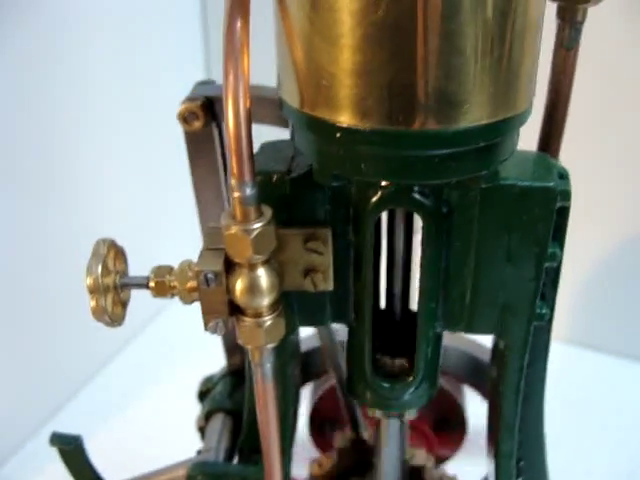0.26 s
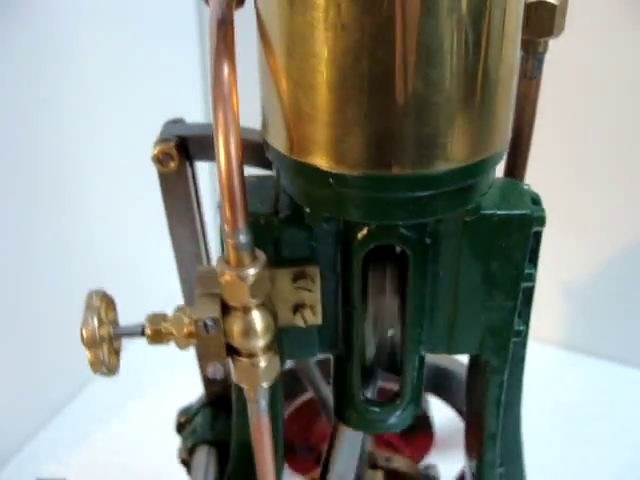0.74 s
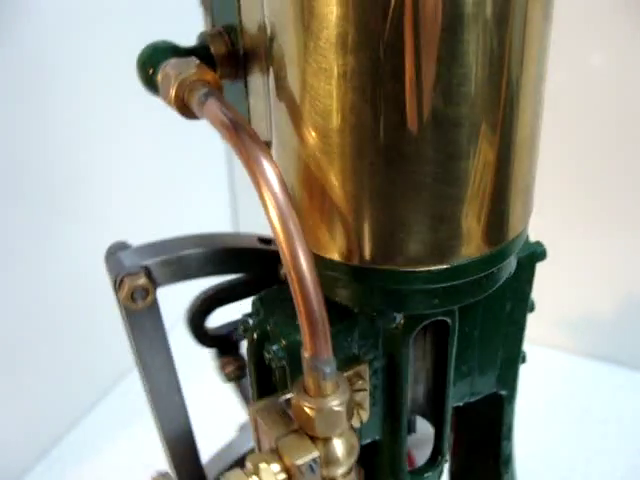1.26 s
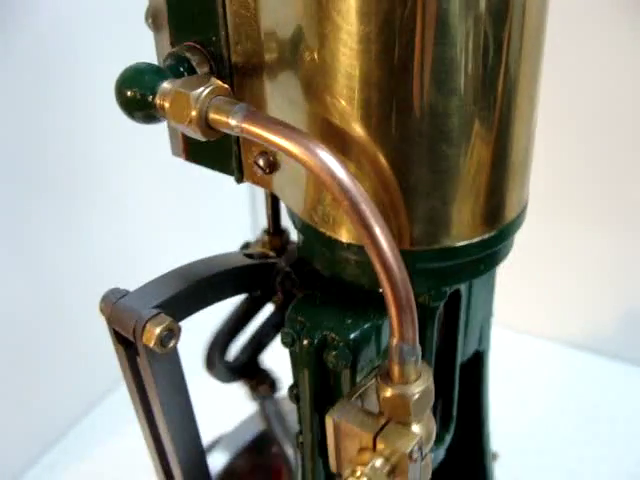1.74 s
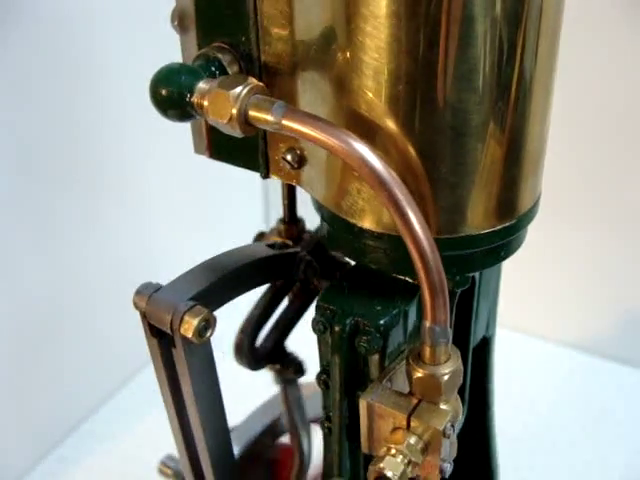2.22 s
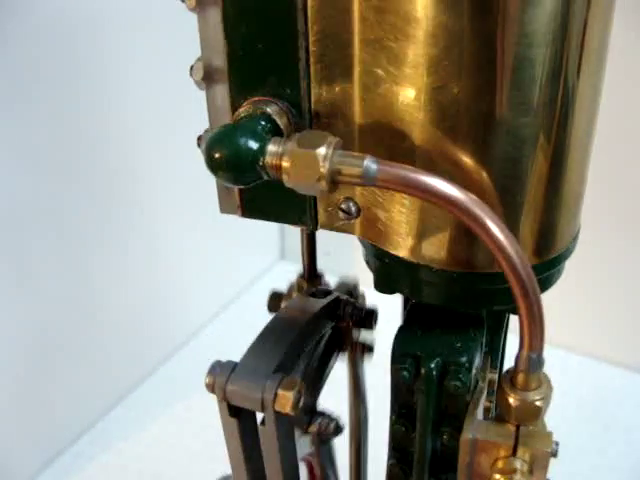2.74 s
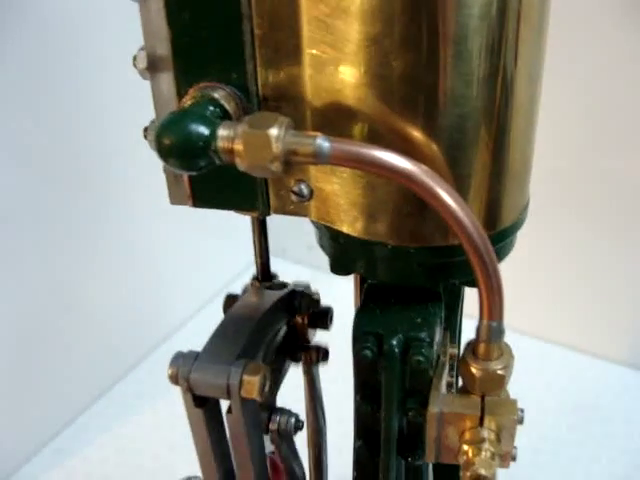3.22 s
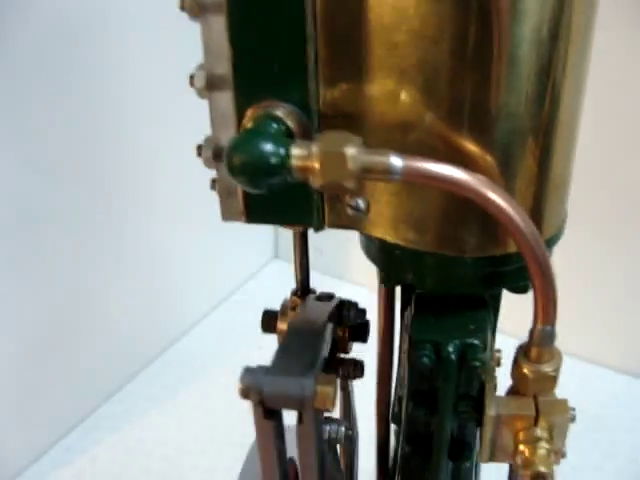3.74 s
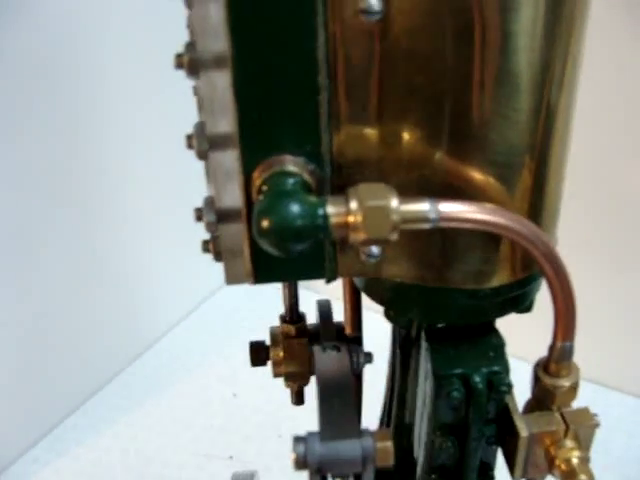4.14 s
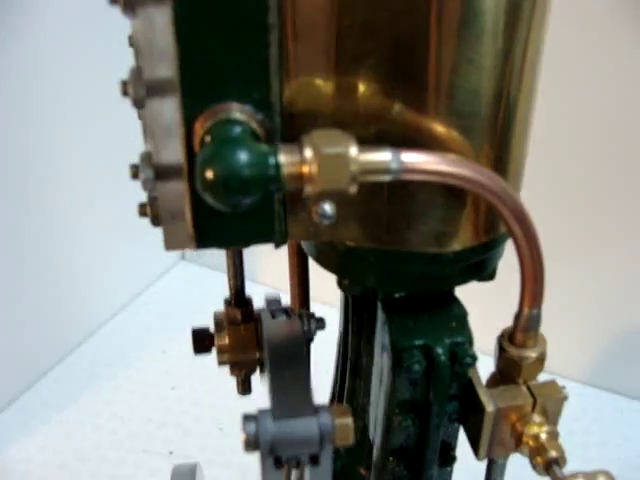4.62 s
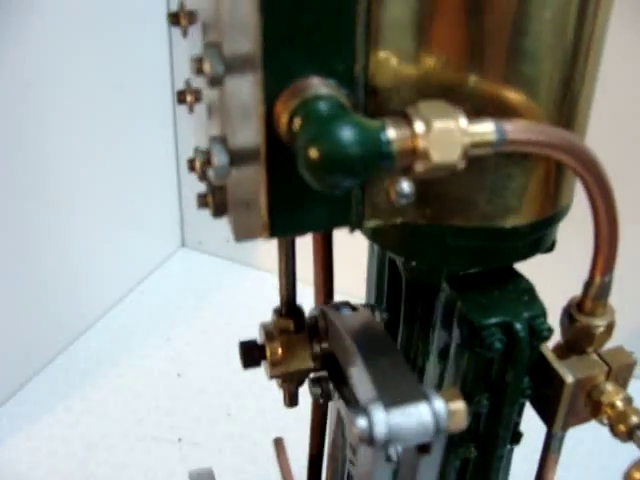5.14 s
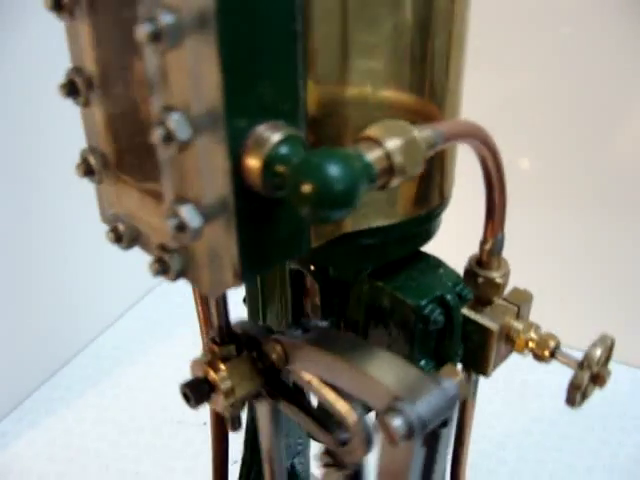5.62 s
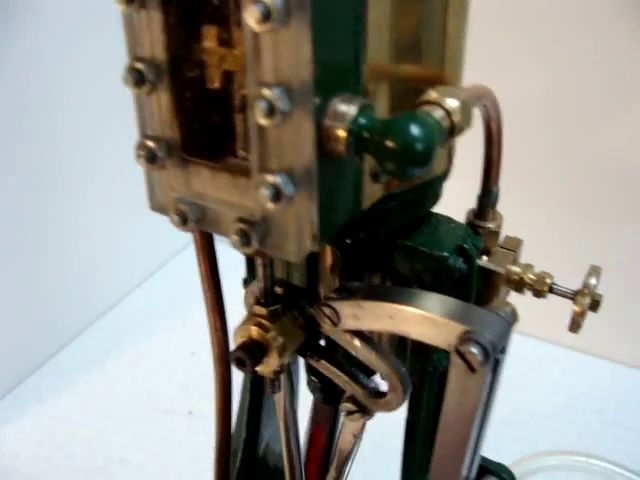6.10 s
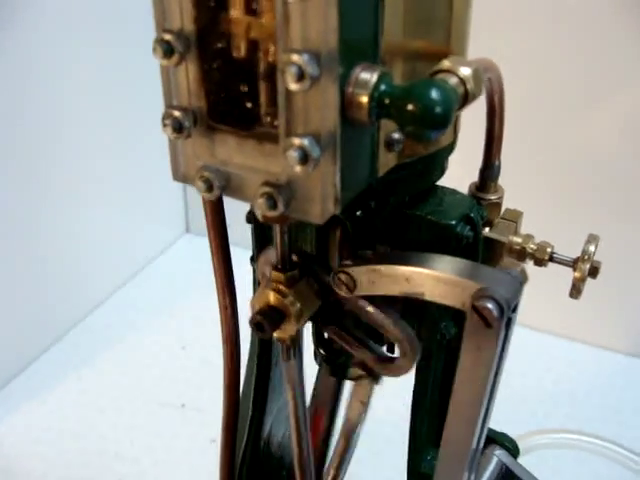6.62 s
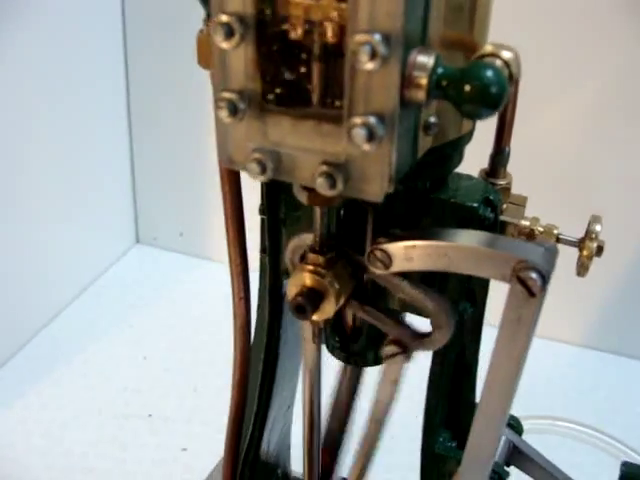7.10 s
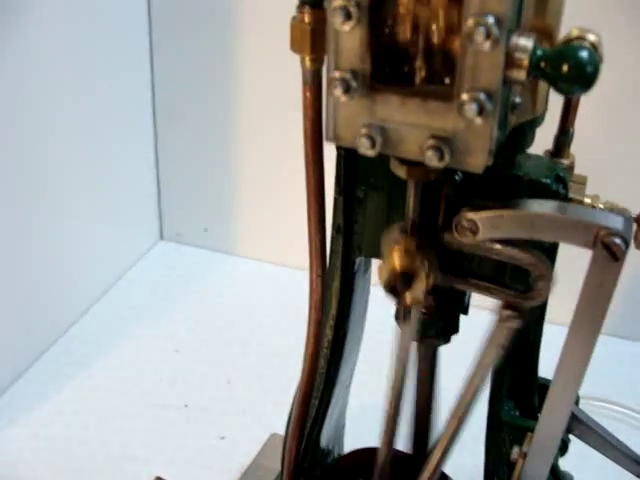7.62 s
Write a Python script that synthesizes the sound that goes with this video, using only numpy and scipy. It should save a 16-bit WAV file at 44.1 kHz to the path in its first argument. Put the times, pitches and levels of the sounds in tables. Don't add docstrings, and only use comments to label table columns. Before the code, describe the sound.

A small model engine running on compressed air on a table in a small room, heard very close. Sharp bright exhaust puffs repeat nearly four times a second, each followed by a metallic tick, a soft thump and thin pipe-like whooshes. Leaking air hisses and swells now and then. A hard handling bump comes around two seconds. The hand-held camera microphone is thin, with grainy, dull-topped treble.

```python
import sys
import numpy as np
from scipy import signal
from scipy.fft import rfft, irfft, next_fast_len
from scipy.io import wavfile
from scipy.ndimage import uniform_filter1d

SR = 44100
rng = np.random.default_rng(int(sys.argv[2]) if len(sys.argv) > 2 else 0)


def volts(x):
    e = np.asarray(x, float) / 20
    return 10 ** e


def dump_mix(stems):
    frames = np.atleast_2d(stems).T
    limited = np.clip(frames, -1, 1)
    pcm = np.round(limited * 32767).astype(np.int16)
    wavfile.write(sys.argv[1], SR, pcm)


N = 346626

# top_release_s, release_db, knock_db
TURNS = [(-0.073, -30, -30), (0.199, -15.5, -17.5), (0.469, -15.5, -17.5), (0.74, -13.5, -30),
         (1.009, -15.9, -36.5), (1.282, -15.5, -17), (1.556, -15, -16), (1.826, -15, -18.5),
         (2.097, -16, -17), (2.369, -15.5, -36), (2.642, -13.5, -23), (2.913, -14.5, -22),
         (3.185, -14, -37), (3.458, -14, -22), (3.728, -14, -17.5), (4.001, -16, -28),
         (4.272, -14.5, -17.5), (4.543, -15, -16.5), (4.815, -16.5, -16), (5.087, -17.5, -17.5),
         (5.362, -17.5, -17.5), (5.632, -17.5, -16.5), (5.905, -17.5, -19), (6.177, -15.5, -18),
         (6.451, -18.5, -19.5), (6.725, -16, -21.5), (6.998, -17, -20.5), (7.276, -16, -20.5),
         (7.55, -16, -22.5), (7.823, -16.5, -30)]
# time_s, view_above_0_1, view_side_0_1, nearness_db, view_into_outlet_db
CAMERA = [(0, 0.35, 0.19, 0, 1), (.75, 0.37, 0.04, 1.1, -8.5), (1.2, 0.4, 0.5, 0.3, -9),
          (1.6, 0.67, 0.04, -0.5, 1), (2.2, .3, .05, -0.5, -2), (2.8, 0.37, .1, .5, 1.5),
          (3.9, 0.28, 0.08, 0.7, 3), (4.9, 0.32, .05, -1, 4.5), (5.4, 0.3, 0.4, -3, 4.5),
          (5.85, 0.18, 0.68, -1, 0.5), (6.5, 0.16, 0.53, -2, -1.5), (7.86, 0.07, 0.69, -1, 0.5)]

# after_top_release_ms, held_open_ms, level_db
TOP_RELEASE = (1.2, 11.5, -.5)
# after_top_release_ms, held_open_ms, level_db
BOTTOM_RELEASE = (117.5, 7.5, -22.5)
# start_ms, end_ms, peak_place_0_1, fullness_ratio, level_db
DOWN_SWEEP = (30.5, 108, .42, 1.23, -22)
# start_ms, end_ms, peak_place_0_1, fullness_ratio, level_db
UP_SWEEP = (157.5, 237.5, .48, 1.09, -22.5)
# centre_hz, width_hz, front_db, above_db, side_db
PIPE_MODES = [(590, 450, -22.5, -43, -24), (877, 510, -19.5, -19, -14.5), (1507, 380, -10, -15, -15),
              (1826, 154, -8, -13.5, -9), (2031, 226, -6.5, -3.5, -13.5), (2625, 167, -3.5, -9, -1.5),
              (3145, 315, -5, -8.5, -9.5), (3900, 220, -6.5, -12.5, -8), (4378, 240, -5.5, -9, -8),
              (4978, 440, -11, -4, -2.5), (5455, 350, -1.5, -2, -8.5), (5948, 320, -1.5, -10.5, -2),
              (6324, 410, -5.5, -3, -5), (6776, 550, -3.5, -12, -5.5), (7370, 380, -9, -6, -5.5),
              (8103, 660, -10, -10.5, -7), (8700, 440, -7.5, -14, -8.5), (9217, 530, -9.5, -13.5, -9.5),
              (10015, 254, -12, -12, -13.5)]
# frequency_hz, gain_db
RELEASE_TILT = [(300, 25.5), (1300, 1), (3000, -2), (4500, -2.5), (6200, 1.5), (10000, -1.5)]

# frequency_hz, density_db_per_hz
LEAK_SPECTRUM = [(300, -43), (600, -6.5), (1100, -6), (1700, -3), (2100, 1), (3200, -4.5), (4000, -3),
                 (4650, -7), (5300, -21), (7000, -13.5), (10000, -17)]
# centre_s, half_length_s, above_leak_db
GUSTS = [
    (1.35, 0.73, 7.3),
    (2.45, 0.16, 9.1),
    (2.9, 0.29, 5.1),
    (3.9, 0.19, 10),
    (5.35, 0.36, 10.6),
]
# frequency_hz, density_db_per_hz
RUMBLE_SPECTRUM = [(15, -49), (25, -3), (86, 8.5), (129, -5.5), (213, -4), (285, 4.5), (401, -3.5),
                   (555, 5), (882, -3), (1080, -3), (1200, -4), (1400, -8), (1500, 5.5), (1950, -44),
                   (3300, -120)]
# centre_hz, width_hz, level_db
TABLE_MODES = [(226, 25, -57), (165, 25, -59), (530, 25, -59), (700, 20, -61)]

# after_top_release_ms, pitch_hz, peak_db, t60_s
LINKAGE = [
    (-6, 231, -29.5, 0.035),
    (59, 528, -30, 0.04),
    (64, 225, -36.5, 0.11),
    (66.5, 570, -39.5, 0.036),
    (81.5, 535, -33, 0.059),
    (202, 490, -43, .05),
]
# pitch_hz, level_db, t60_s
THUMP_MODES = [(262, 0, .028), (222, -15, .07), (170, -12, .03), (550, -11, .025), (48, -10, .04)]
# pitch_hz, level_db, t60_s
POP_MODES = [(528, -1, .04), (265, -2, .03), (700, -9, .035), (530, -18, .12)]
# pitch_hz, level_db, t60_s
KNOCK_MODES = [(2770, 3.5, 0.0033), (3320, 2.5, 0.006), (4060, 4, 0.0029), (4870, -24, 0.0059),
               (1306, -10.5, 0.013)]

# centre_s, half_length_s, pitch_hz, width_hz, level_db
BRUSHES = [
    (5.36, 0.18, 4400, 2200, -32),
    (3.3, 0.066, 260, 270, -39),
    (0.3, 0.067, 180, 140, -45),
]
# start_s, pitch_hz, peak_db, t60_s
GRIP = [
    (.32, 199, -26, 0.08),
    (.68, 120, -43, 0.098),
    (2.334, 235, -28, .07),
    (2.393, 163, -5, 0.021),
    (2.311, 1650, -33, 0.25),
    (3.1, 151, -39, .06),
]
# frequency_hz, step_db
ROUNDING_STEP = [(2500, -61), (4300, -34), (5000, -20.5), (6500, -19), (8000, -25), (10000, -28.5)]

OPEN_DB_PER_MS = 7.5
SHUT_DB, SHUT_BEND = 5.5, 0.62
SEEP_DB = -38.5
STROKE_SCATTER_DB, BLOW_SCATTER_DB = 0.8, 1.3
LEAK_DB = -43
RUMBLE_DB, RUMBLE_FOLLOW = -45, 0.071
POP_DB, POP_MS = -28, 7.5
KNOCK_MS = 59.3
THUMP_DB, THUMP_MS, THUMP_FOLLOW = -36, 112.5, 0.23
ROOM_T60_S, ROOM_DB, ROOM_TOP_HZ = 0.22, -11, 3500
MIC_LOW_HZ, TOP_HZ = 120, 10080
FRAME_S, FRAME_START_S = 0.036, 0.014
STARVE_DB, STARVE_HZ, STARVE_HZ_PER_DB, AFTER_DB = 13.5, 5600, 190, 5.5

HZ = np.fft.rfftfreq(next_fast_len(N + SR), 1 / SR)
TIME_S = np.arange(N) / SR
RING_S = np.arange(SR // 6) / SR
START_S, RELEASE_DB, KNOCK_DB = np.transpose(TURNS)


def through(x, response):
    size = 2 * (len(HZ) - 1)
    return irfft(rfft(x, size) * response, size)[:N]


def unit(x):
    return x / np.sqrt(np.mean(x ** 2))


def colour(points):
    hz, db = np.transpose(points)
    return volts(np.interp(np.log(HZ + 1), np.log(hz), db))


def resonance(hz, width_hz):
    return 1j * HZ * width_hz / (hz ** 2 - HZ ** 2 + 1j * HZ * width_hz)


def noise_band(hz, width_hz):
    return unit(through(rng.standard_normal(N), resonance(hz, width_hz) ** 2))


def flicker(rate_hz):
    return unit(through(rng.standard_normal(N), 1 / (1 + (HZ / rate_hz) ** 2)))


def at_camera(column, s):
    path = np.array(CAMERA)
    return np.interp(s, path[:, 0], path[:, column])


def add(out, sound, s):
    start = int(s * SR)
    if 0 <= start < N:
        out[start:start + len(sound)] += sound


def ring(hz, t60_s, push_ms):
    push = np.hanning(int(push_ms * SR / 1000) + 3)
    grow = np.cumsum(np.pad(push, (0, len(RING_S) - len(push)))) / push.sum()
    return grow * np.sin(2 * np.pi * hz * RING_S) * volts(-60 * RING_S / t60_s)


def blows(modes, ms, turn_db, push_ms, gain_db):
    out = np.zeros(N + SR)
    chance = rng.standard_normal((len(TURNS), 2 * len(modes) + 1))
    for start_s, blow_db, c in zip(START_S, turn_db, chance):
        sound = 0
        for k, (hz, db, t60_s) in enumerate(modes):
            sound = sound + volts(db + c[2 * k]) * ring(hz * (1 + 0.03 * c[2 * k + 1]), t60_s, push_ms)
        add(out, -volts(blow_db + gain_db) * sound, start_s + (ms + 0.3 * c[-1]) / 1000)
    return out[:N]


def blow_scatter():
    return BLOW_SCATTER_DB * rng.standard_normal(len(TURNS))


def steady(points, db, patchy_db):
    return unit(through(rng.standard_normal(N), colour(points))) * volts(db + patchy_db * flicker(25))


def crank():
    starts = np.append(START_S, 2 * START_S[-1] - START_S[-2])
    return np.interp(TIME_S, starts, np.arange(len(starts)))


def crack(ms, at_ms, held_ms, db):
    opening_db = np.minimum(OPEN_DB_PER_MS * (ms - at_ms), 0)
    shutting_db = SHUT_DB * np.maximum(ms - at_ms - held_ms, 0) ** SHUT_BEND
    return db + opening_db - shutting_db


def stroke(ms, start_ms, end_ms, peak, fullness, db):
    place = np.clip((ms - start_ms) / (end_ms - start_ms), 0, 1) ** (np.log(0.5) / np.log(peak))
    return db + 20 * fullness * np.log10(np.abs(np.sin(np.pi * place)) + 1e-4)


def flow(shape, port, turn_db, lead_ms=20, turn_ms=272):
    place = crank() + lead_ms / turn_ms
    turn = np.minimum(place.astype(int), len(TURNS) - 1)
    return volts(shape((place - turn) * turn_ms - lead_ms, *port) + turn_db[turn])


def pipe_response(view):
    pipe = 0
    for k, mode in enumerate(PIPE_MODES):
        pipe = pipe + (-1) ** k * volts(mode[2 + view]) * resonance(mode[0], mode[1])
    pipe = pipe * np.abs(pipe) ** 0.5
    return pipe / np.sqrt(np.mean(np.abs(pipe) ** 2))


def exhaust():
    release_air, sweep_air = rng.standard_normal((2, N))
    near_db = at_camera(3, START_S) + STROKE_SCATTER_DB * rng.standard_normal((3, len(TURNS)))
    release = flow(crack, TOP_RELEASE, RELEASE_DB) + flow(crack, BOTTOM_RELEASE, 1.5 * near_db[0])
    release = release * volts(1.6 * flicker(300))
    sweep = flow(stroke, DOWN_SWEEP, near_db[1]) + flow(stroke, UP_SWEEP, near_db[2])
    sweep = sweep * volts(1.2 * flicker(60) + 1.1 * flicker(400))
    jet = through(release * release_air, colour(RELEASE_TILT)) + (sweep + volts(SEEP_DB)) * sweep_air
    above = np.clip(at_camera(1, TIME_S), 0, 1)
    side = np.clip(at_camera(2, TIME_S), 0, 1)
    front = np.clip(1 - above - side, 0, 1)
    heard = sum(share * through(jet, pipe_response(view)) for view, share in enumerate((front, above, side)))
    return heard * volts(0.5)


def leak():
    swell_db = sum(db * np.exp(-((TIME_S - s) / half_s) ** 4) for s, half_s, db in GUSTS)
    return steady(LEAK_SPECTRUM, LEAK_DB + swell_db, 3.3)


def rumble(rumble_db):
    return steady(RUMBLE_SPECTRUM, rumble_db, 2.5)


def table(rumble_db):
    return sum(volts(db + rumble_db + 45) * noise_band(hz, width_hz) for hz, width_hz, db in TABLE_MODES)


def linkage(pop_db):
    out = np.zeros(N + SR)
    chance = rng.standard_normal((len(TURNS), len(LINKAGE), 3))
    for start_s, blow_db, rows in zip(START_S, pop_db, chance):
        for (ms, hz, db, t60_s), c in zip(LINKAGE, rows):
            level_db = db + 0.4 * (blow_db + 35) + 2.5 * c[0]
            bump = ring(hz * (1 + 0.05 * c[1]), t60_s, push_ms=4)
            add(out, volts(level_db) * bump, start_s + (ms + 1.5 * c[2]) / 1000)
    return out[:N]


def thump(outlet_db):
    thump_db = THUMP_DB + THUMP_FOLLOW * outlet_db + at_camera(3, START_S) + blow_scatter()
    return blows(THUMP_MODES, THUMP_MS, thump_db, push_ms=7, gain_db=22.5)


def pop(pop_db):
    return blows(POP_MODES, POP_MS, pop_db, push_ms=3.3, gain_db=5)


def knock():
    return blows(KNOCK_MODES, KNOCK_MS, KNOCK_DB, push_ms=0.42, gain_db=8)


def brushes():
    out = 0
    for s, half_s, hz, width_hz, db in BRUSHES:
        swell = np.exp(-((TIME_S - s) / half_s) ** 2) * volts(db + 2 * flicker(40))
        out = out + swell * noise_band(hz, width_hz)
    return out


def grip():
    out = np.zeros(N + SR)
    for s, hz, db, t60_s in GRIP:
        add(out, volts(db) * ring(hz, t60_s, push_ms=11), s)
    return out[:N]


def room(x):
    t = np.arange(SR // 2) / SR
    tail = rng.standard_normal(len(t)) * 1000.0 ** (-t / ROOM_T60_S) * (t > 0.003)
    echo = rfft(tail / np.sqrt(np.sum(tail ** 2)), 2 * (len(HZ) - 1))
    return through(x, echo / (1 + (HZ / ROOM_TOP_HZ) ** 2))


def scene():
    outlet_db = at_camera(4, START_S)
    pop_db = POP_DB + outlet_db + blow_scatter()
    rumble_db = RUMBLE_DB + RUMBLE_FOLLOW * at_camera(4, TIME_S)
    engine = exhaust() + linkage(pop_db) + thump(outlet_db) + pop(pop_db) + knock()
    background = leak() + rumble(rumble_db) + table(rumble_db) + brushes() + grip()
    return (engine + volts(ROOM_DB) * room(engine) + background)[None]


def frames(count, size):
    return np.floor((np.arange(count) * size / SR - FRAME_START_S) / FRAME_S).astype(int) + 1


def starved(terms, hz, size):
    power = np.mean(terms[:, hz > STARVE_HZ] ** 2, axis=1)
    db = 10 * np.log10(uniform_filter1d(power, size=2) + 1e-12)
    frame = frames(len(db), size)
    below = np.zeros(len(db))
    for k in np.unique(frame):
        part = db[frame == k]
        loudest_ahead = np.maximum.accumulate(part[::-1])[::-1]
        below[frame == k] = np.maximum(loudest_ahead, part.max() - AFTER_DB) - part
    below = below[:, None] - STARVE_DB
    return (below > 0) & (hz > STARVE_HZ - STARVE_HZ_PER_DB * below)


def camera_rounding(x, doubt_db=3.0, follow=0.8, size=192):
    n, k = np.arange(2 * size) + 0.5, np.arange(size) + 0.5
    window = np.sqrt(2 / size) * np.sin(np.pi * n / (2 * size))
    basis = window * np.cos(np.pi / size * (n + size / 2) * k[:, None])
    count = N // size + 2
    blocks = np.pad(x, (size, (count + 1) * size - N - size)).reshape(-1, size)
    terms = np.hstack([blocks[:-1], blocks[1:]]) @ basis.T
    hz = k * SR / (2 * size)
    doubt = rng.standard_normal((count // 3 + 1, size // 6 + 1))
    doubt = doubt + 0.6 * doubt[:, :1]
    doubt = np.repeat(np.repeat(doubt, 3, axis=0), 6, axis=1)[:count, :size]
    frame = frames(count, size)
    log_power = np.log(np.mean(terms ** 2, axis=1) + 1e-9)
    frame_power = np.exp(np.bincount(frame, log_power) / np.bincount(frame))[frame]
    loud = (frame_power[:, None] * 1000 + 1e-9) ** (follow / 2)
    step = volts(np.interp(hz, *np.transpose(ROUNDING_STEP)) + doubt_db * doubt) * loud
    lost = starved(terms, hz, size)
    terms = step * np.sign(terms) * np.floor(np.abs(terms) / step + 0.4)
    halves = np.where(lost, 0, terms) @ basis
    return (halves[1:, :size] + halves[:-1, size:]).ravel()[:N]


def roll_off(x):
    return signal.sosfilt(signal.butter(12, 11000, fs=SR, output="sos"), x)


def record(dry):
    thin = signal.sosfilt(signal.butter(2, MIC_LOW_HZ, "high", fs=SR, output="sos"), dry[0])
    rounded = camera_rounding(np.tanh(1.1 * thin) / 1.1)
    mix = through(rounded, 1 / (1 + (HZ / TOP_HZ) ** 120))
    return roll_off(mix[None])


dry = scene()
out = record(dry)
dump_mix(out)
```